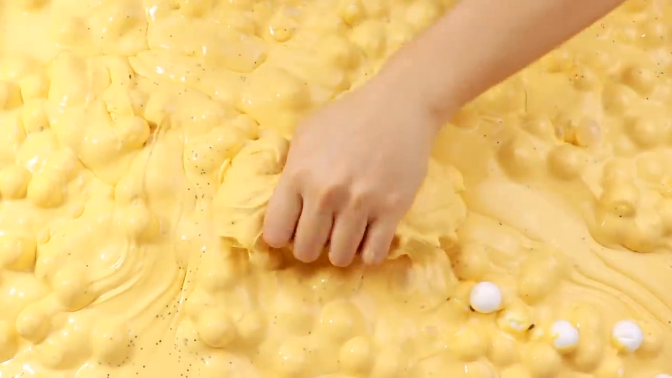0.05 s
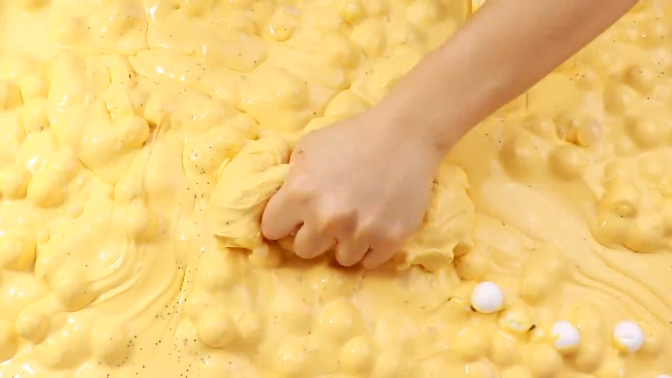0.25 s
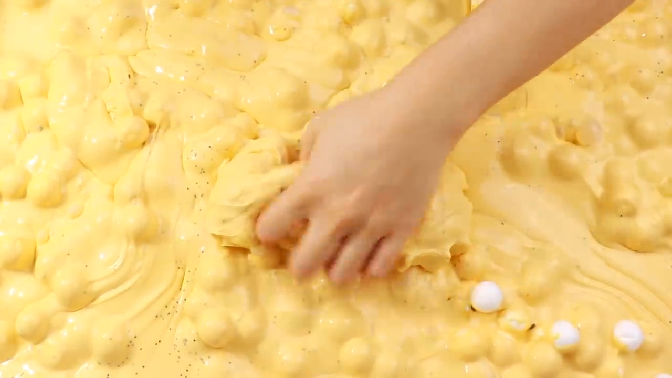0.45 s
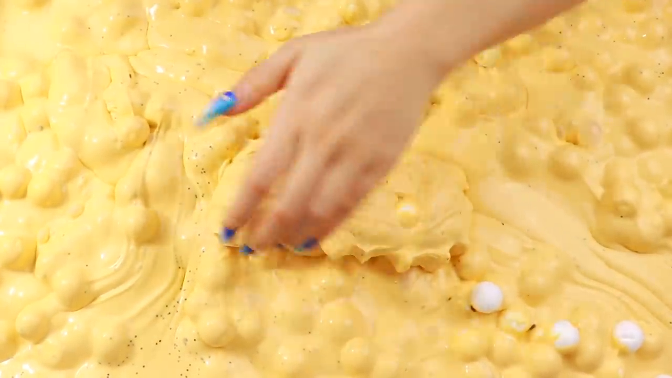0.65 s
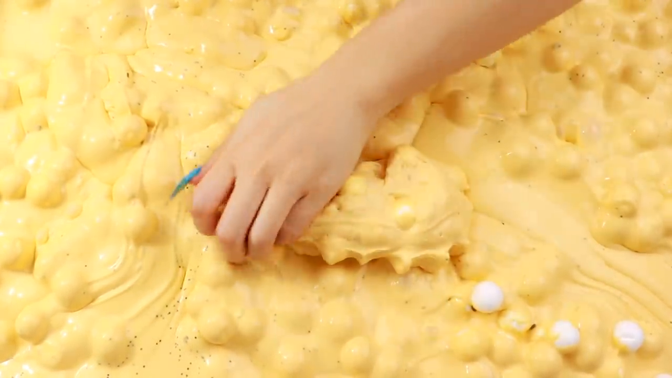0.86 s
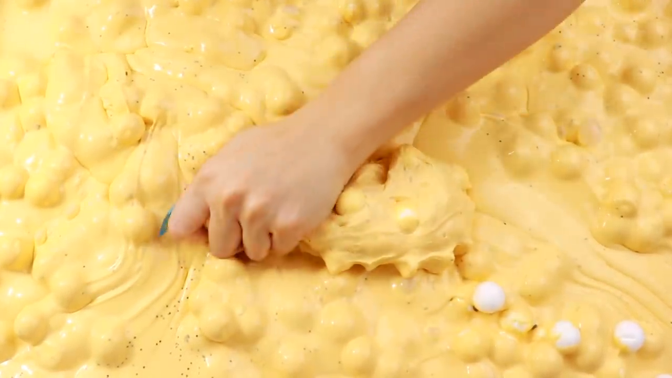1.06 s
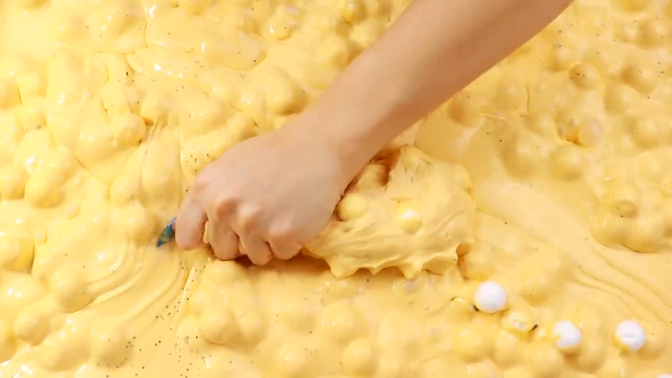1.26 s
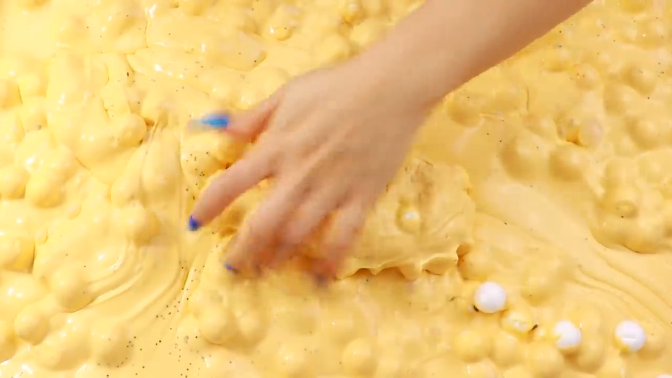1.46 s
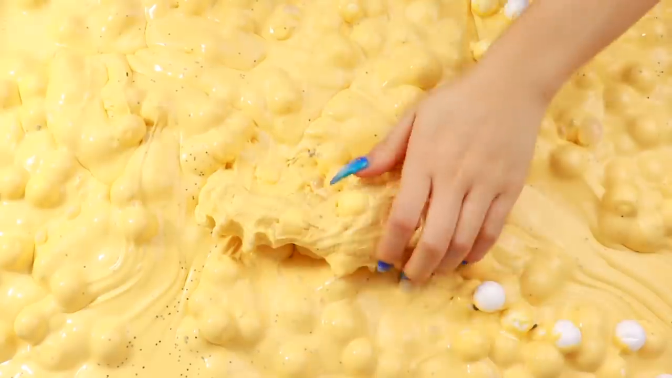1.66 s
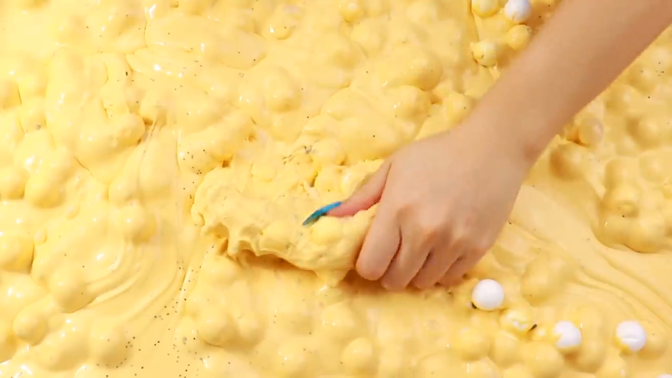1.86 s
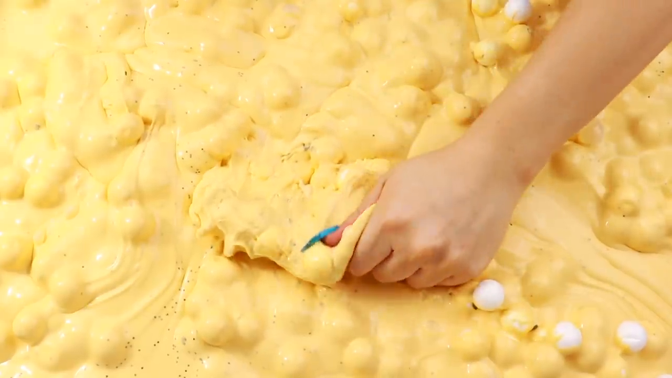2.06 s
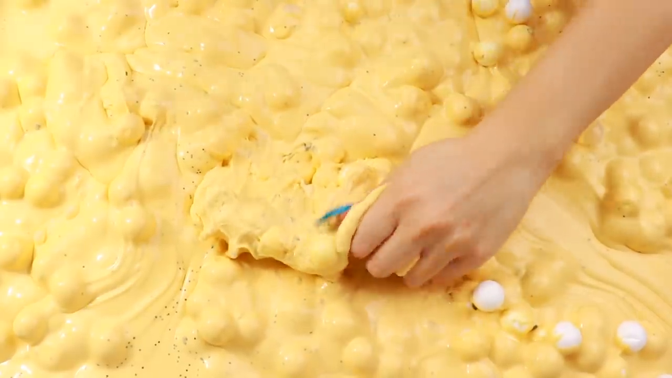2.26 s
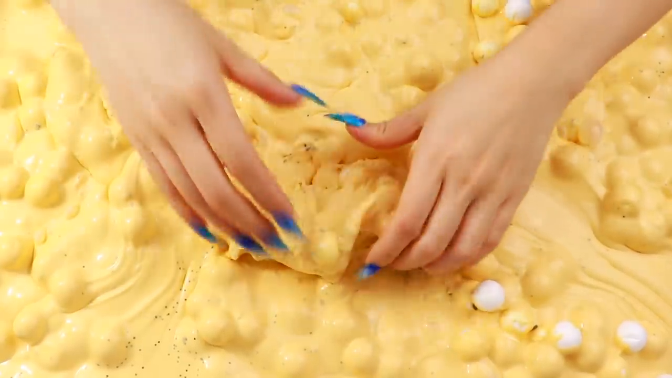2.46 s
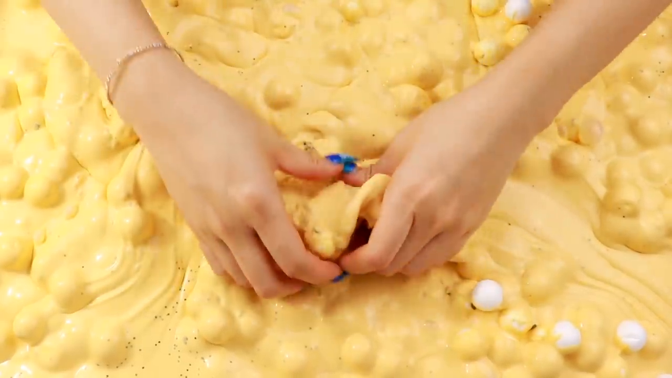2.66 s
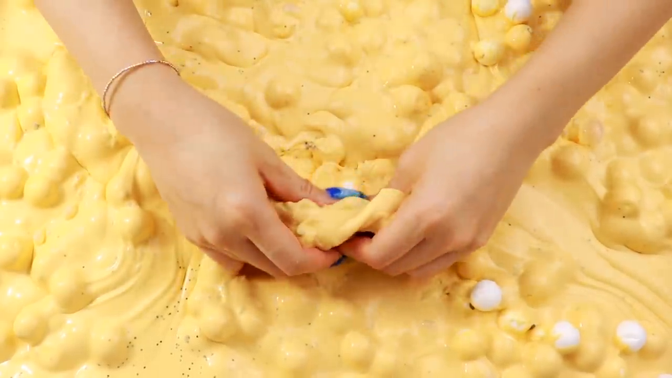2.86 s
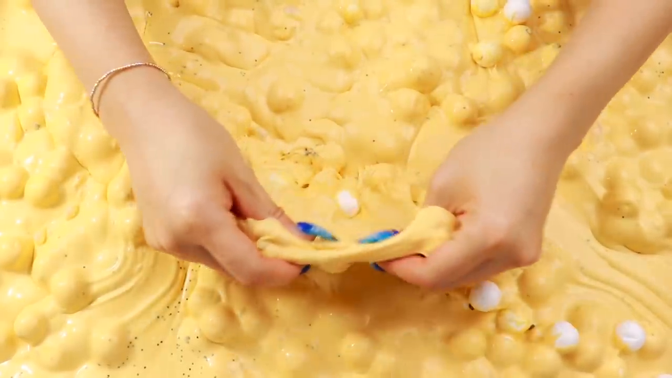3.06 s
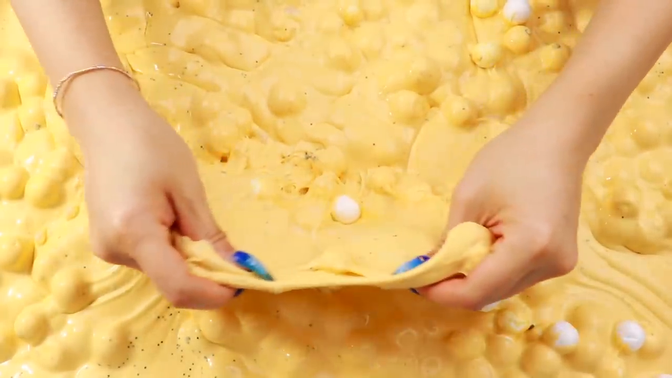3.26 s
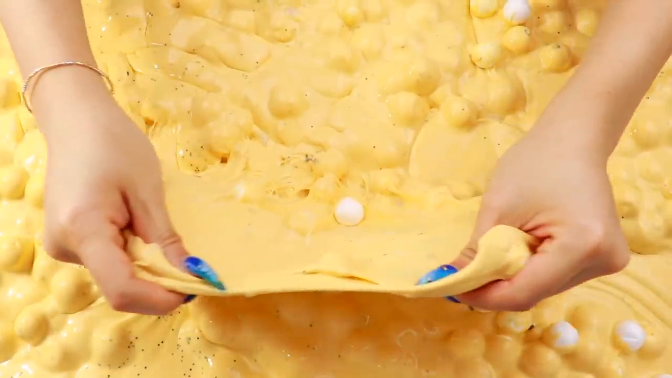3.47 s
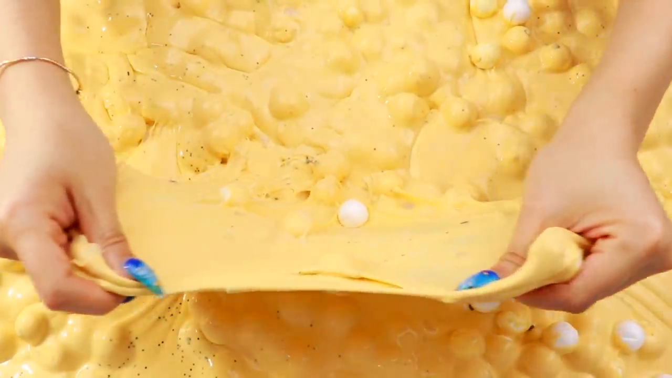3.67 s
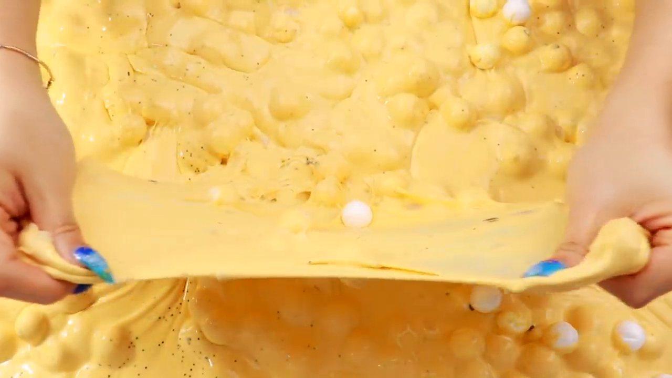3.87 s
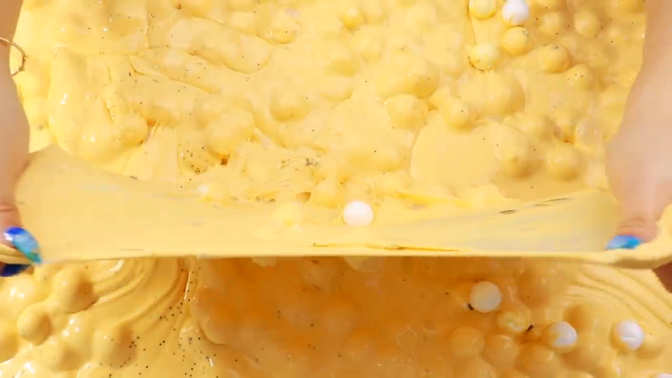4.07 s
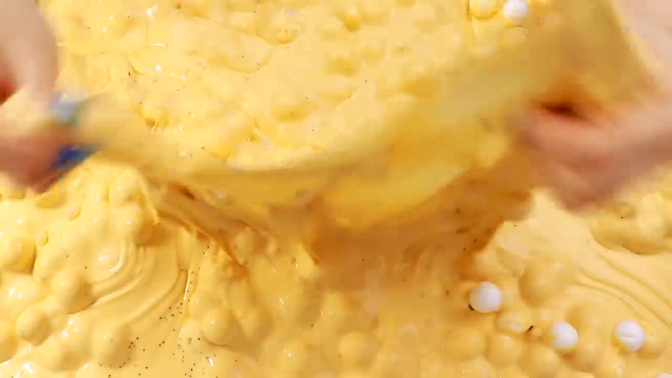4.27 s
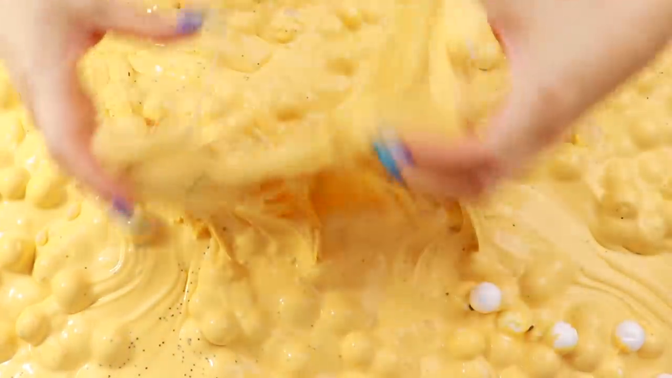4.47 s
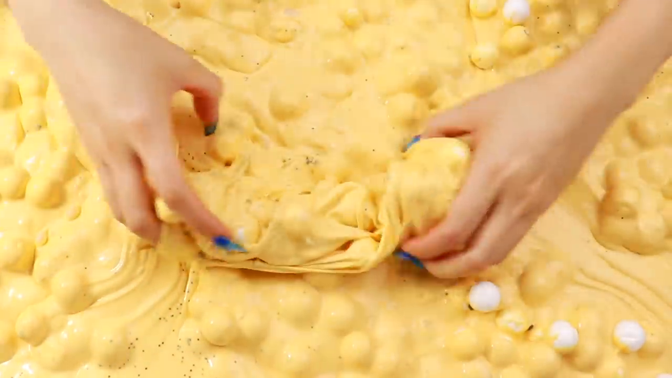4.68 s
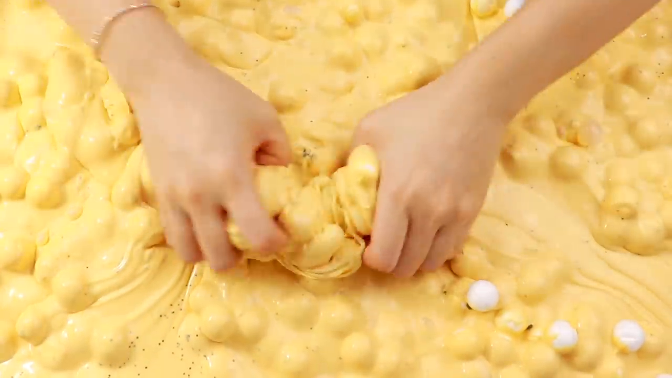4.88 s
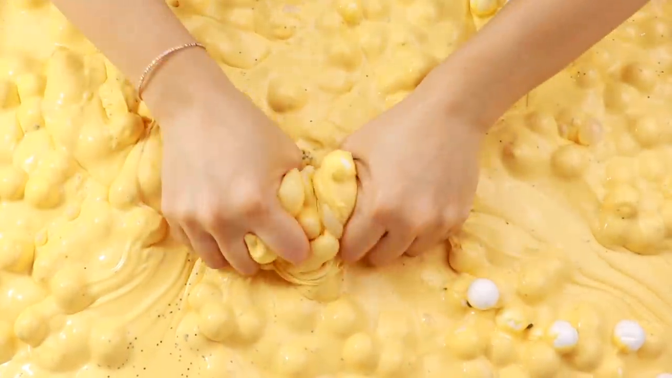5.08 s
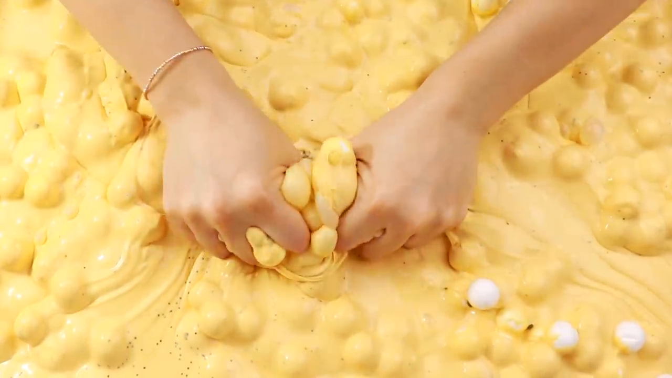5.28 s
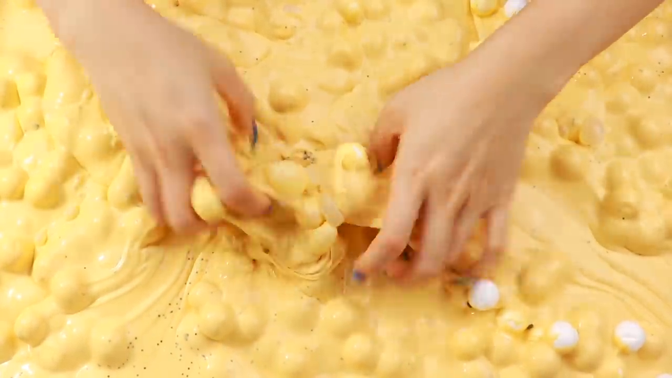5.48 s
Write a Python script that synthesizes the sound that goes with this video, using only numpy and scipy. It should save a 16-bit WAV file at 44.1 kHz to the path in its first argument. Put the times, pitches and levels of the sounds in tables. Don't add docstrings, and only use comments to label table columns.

```python
import sys
import numpy as np
from scipy import signal
from scipy.fft import rfft, irfft
from scipy.io import wavfile

SR = 44100
rng = np.random.default_rng(int(sys.argv[2]) if len(sys.argv) > 2 else 0)


def magnitude_from_level(level_db):
    exponent = np.asarray(level_db, float) / 20
    return 10 ** exponent


def wav_out(sig):
    wavfile.write(sys.argv[1], SR, np.round(np.clip(np.atleast_2d(sig).T, -1, 1) * 32767).astype(np.int16))


N = 243873

# (time [s], level [dB])
KNEAD = [(0, -47.5), (.35, -53.5), (.54, -66), (.72, -86), (.8, -56), (1.3, -62), (1.62, -74),
         (1.72, -55.5), (2.3, -56.5), (2.42, -72.5), (2.6, -58), (2.95, -54.5), (3.62, -69), (3.7, -70),
         (4.16, -74.5), (4.45, -65), (4.9, -55.5), (5.53, -57.5)]
# (time [s], half length [ms], fizz [dB], squelch above fizz [dB])
PEELS = [(0, 6.7, -23, -6), (.3, 26, -52, -9), (0.419, 15.6, -37.5, -7.5), (0.467, 25.6, -38.5, -0.5),
         (.95, 27, -51, -9), (1.101, 37, -47, -1.5), (1.382, 23, -39.5, -4.5), (1.411, 16, -40.5, -4),
         (1.452, 9.5, -34, -5.5), (2.279, 20.6, -47.5, 1.5), (2.326, 13.6, -39, 0.5),
         (2.372, 12.7, -45.5, 0), (3.155, 11, -53, -1), (4.266, 49, -49.5, -13), (4.94, 38, -40, -6),
         (5.206, 16, -47.5, 11.5), (5.399, 28, -39, -21), (5.46, 59, -38.5, -1)]
# (frequency [Hz], level [dB per Hz])
FIZZ_SPECTRUM = [(1060, -35), (1800, -0.5), (2200, -4), (4790, -11.5), (10600, -10), (13400, -5.5),
                 (16000, -16.5)]
# (frequency [Hz], level [dB per Hz])
SQUELCH_SPECTRUM = [(120, -31.5), (230, -2), (434, 5.5), (538, 3.5), (1860, 9), (2600, -7.5), (3380, -30),
                    (5720, -120)]
# (frequency [Hz], level [dB per Hz])
ROOM_TONE_SPECTRUM = [(59, -22), (100, 2.5), (200, -10), (398, -5), (1360, -23.5), (10900, -25),
                      (16000, -26)]
# (time [s], level [dB])
SHAKE = [(0, -53.5), (0.25, -43), (0.36, -54), (0.47, -45), (0.6, -55.5), (0.9, -44.5), (1.3, -61.5),
         (1.55, -48.5), (2.1, -55), (2.35, -55.5), (2.55, -42.5), (2.8, -53), (3.17, -50.5), (3.35, -61),
         (4, -62), (4.3, -53), (4.6, -55), (5.45, -57)]
# (time [s], peak [dB], centre [Hz])
SNAPS = [(0.0107, -22, 9200), (0.0142, -14.5, 6750), (0.0553, -13.5, 5400), (0.1176, -1.5, 8940),
         (0.1698, -12.5, 8560), (0.3855, -23, 3580), (0.7219, -12, 8230), (0.7258, -15, 9470),
         (0.8578, -15, 5120), (0.9736, -9.5, 4440), (1.0065, -28.5, 2200), (1.0382, -23, 7640),
         (1.0953, -31.5, 4700), (1.1075, -17.5, 9180), (1.2744, -20, 7360), (1.3863, -25, 3120),
         (1.6949, -23.5, 3310), (1.84, -12, 6580), (1.8843, -24, 4800), (1.9026, -15.5, 6640),
         (2.2798, -20, 7750), (2.5729, -23.5, 10400), (2.5818, -20, 8930), (2.6224, -15.5, 8600),
         (2.7238, -19.5, 3800), (2.7594, -14.5, 11510), (2.7807, -16, 7450), (5.0039, -10, 3460),
         (5.0834, -15.5, 9850)]
# (time [s], peak [dB], centre [Hz])
PINGS = [(0.0762, -22, 10800), (0.4148, -17.5, 2700), (0.9639, -26.5, 3300), (1.0273, -17, 9690),
         (1.0469, -21, 8770), (1.0558, -11, 9010), (1.1215, -18.5, 10930), (1.1418, -8, 14080),
         (1.2123, -17.5, 11340), (1.7351, -21.5, 4520), (2.606, -20.5, 12500), (2.6881, -17, 8360),
         (2.7678, -21, 3570), (2.8744, -17.5, 8530), (2.9614, -18, 12370), (4.2807, -24, 8690),
         (4.9324, -20, 5210), (4.9845, -23, 2790), (5.1331, -25, 6280), (5.2254, -18, 2570)]
# (time [s], peak [dB], centre [Hz])
TICKS = [(0.0724, -24, 3210), (0.218, -26, 12730), (0.7855, -32, 7660), (0.8215, -35, 3600),
         (0.842, -28.5, 5180), (0.9513, -24, 6450), (1.138, -21.5, 9000), (1.2472, -32.5, 3530),
         (1.4435, -26, 8570), (1.7469, -21, 3520), (1.7877, -27.5, 3400), (2.1275, -38, 3000),
         (2.2544, -26, 10200), (2.3664, -31, 4230), (2.5518, -34.5, 7560), (2.7395, -34, 6320),
         (2.8312, -26.5, 4140), (2.9407, -45, 3040), (2.951, -22.5, 2130),
         (3.009, -29, 5830), (3.1422, -22, 12100), (3.1533, -22.5, 7160), (3.173, -29.5, 8340),
                 (3.288, -50, 3110), (3.325, -34.5, 6160), (3.414, -35.5, 8100), (3.4843, -31, 3620),
                 (3.5061, -26, 7050), (3.573, -33, 4520), (3.591, -47, 5340), (3.617, -24.5, 9670),
                 (3.828, -44, 4240), (3.913, -44, 2656), (4.256, -38, 4980), (4.2634, -23.5, 9180),
                 (4.654, -42.5, 3310), (4.6807, -36.5, 3480), (4.712, -37, 3870), (4.7922, -25, 4080),
                 (4.816, -28, 3060), (4.839, -31, 10690), (4.853, -25.5, 8900), (5.0724, -20, 10600)]
# (time [s], peak [dB], centre [Hz], spread [octaves], burst [ms])
BIG_POCKETS = [(0.2351, 6.5, 7900, 0.65, 7), (0.2654, 9, 6490, 1.7, 5.1), (0.8624, 6, 7000, 1.6, 1.8),
               (1.06, 8, 9040, 1.6, 0.94), (1.1717, 9.5, 9360, 0.26, 2.2), (2.0027, -2, 7600, 0.57, 6.8),
               (2.7897, -11, 7636, 0.96, 7), (4.73, -15.5, 6160, 1.5, 3.2), (4.8762, -4.5, 4020, 0.59, 6.2),
               (4.924, -5, 6310, 1.3, 4), (4.9442, -17, 4470, 1.4, 3), (5.0929, -15.5, 7140, 3.2, 5.7),
               (5.1817, 1, 3534, 0.65, 5.8)]
# (time [s], peak [dB], centre [Hz], spread [octaves])
SMALL_POCKETS = [(0.0354, 0, 10900, 0.87), (0.0418, -18.5, 7320, 2.1), (0.0948, -9.5, 13540, 0.3),
                 (0.101, -2, 10400, 0.61), (0.1202, 4.5, 9600, 1.28), (0.1356, 9.5, 10100, 0.44),
                 (0.158, -9, 5800, 2), (0.1615, 6.5, 5230, 1.9), (0.167, -8, 8260, 2.26),
                 (0.1989, -1, 11300, 0.64), (0.2086, -13.5, 7100, 0.98), (0.3891, -17.5, 3140, 0.34),
                 (0.4085, -11, 7500, 1.26), (0.4246, -10.5, 4130, 2.3), (0.7053, -12, 5740, 0.72),
                 (0.8673, -7.5, 3600, 0.35), (0.875, 0, 4400, 1.54), (1.0582, -3, 8700, 0.95),
                 (1.8012, -11.5, 2910, 0.86), (1.942, 2, 8600, 1.42), (1.9621, -5.5, 10700, 0.88),
                (2.1399, -3.5, 4340, 1.63), (2.303, -21, 10570, 1.2), (2.6435, -17, 3940, 1.2),
                (3.0269, -11, 11300, 0.37), (4.5248, -9.5, 12930, 0.5), (4.7974, -13, 10200, 1),
                (5, -14.5, 5940, 1.5), (5.017, -16, 5960, 1), (5.0248, 1, 10680, 1.56),
                (5.035, -9, 3670, 1.1), (5.1238, 5.5, 8000, 2.1), (5.1393, -10, 2880, 0.4),
                (5.151, -2.5, 7420, 3.3), (5.254, -16.5, 3760, 0.51), (5.4868, -8, 7470, 2.4)]
# (time [s], peak [dB], centre [Hz])
THREADS = [(0.043, -21, 2500), (0.061, -26.5, 1800), (0.178, -30, 7890), (0.184, -34, 1500),
           (0.2257, -25, 5000), (0.378, -40, 2200), (0.429, -19, 2500), (0.434, -25, 1800),
           (0.814, -36, 1900), (0.837, -34, 4600), (0.916, -28, 2500), (0.939, -38, 1200),
           (1.222, -28.5, 3960), (1.234, -36.5, 1780), (1.624, -46.5, 2300), (1.649, -53, 7500),
           (1.777, -37, 2500), (1.843, -28, 1190), (1.906, -28, 2490), (1.958, -32, 2000),
           (1.978, -24, 2200), (2.02, -31.5, 1200), (2.041, -27.5, 2500), (2.106, -33.5, 3500),
           (2.118, -38, 2500), (2.214, -44, 1500), (2.381, -31.5, 2950), (2.545, -38, 2520),
           (2.62, -28.5, 3470), (2.631, -44, 3000), (2.708, -29, 4000), (2.899, -38, 5000),
           (2.931, -60, 1000), (3.039, -44.5, 3000), (3.2037, -33.5, 10400), (3.254, -38.5, 8500),
           (3.268, -54, 2850), (3.2937, -55.5, 6000), (3.372, -42.5, 6000), (3.386, -40, 1520),
           (3.432, -44, 1780), (3.6424, -39.5, 3260), (3.693, -53.5, 3330), (3.717, -48.5, 2590),
           (4.1892, -45, 6500), (4.212, -45, 9500), (4.3185, -49, 5000), (4.365, -39, 5430),
           (4.383, -43.5, 4250), (4.4576, -53, 2020), (4.575, -48.5, 4060), (4.7547, -37, 1190),
           (4.8668, -36, 1500), (4.872, -26, 3000), (4.89, -19, 4500), (5.006, -15, 1900)]
# (time [s], peak [dB], cavity [Hz])
PLOPS = [(0.118, -14.5, 1120), (0.1352, -10.5, 1830), (0.1984, -18, 910), (0.2072, -22, 1620),
         (0.2346, -7.5, 2045), (0.921, -27, 1275), (0.4245, -15.5, 1940), (0.4584, -20.5, 1867),
         (0.4817, -33, 980), (0.6914, -42, 876), (0.9029, -30.5, 1034), (0.9507, -26.5, 1250),
         (1.0055, -18, 1700), (1.027, -24, 1130), (1.06, -11, 1095), (1.1947, -26.5, 1690),
         (1.3999, -13.5, 1864), (1.6948, -20, 1786), (1.7358, -27, 1960), (1.7517, -21, 1660),
         (1.801, -25, 1170), (1.8217, -32.5, 430), (1.8589, -25, 1020), (1.8686, -23.5, 790),
         (1.8848, -29, 1400), (1.9418, -20, 1220), (2.0025, -20.5, 1045), (2.1398, -30, 937),
         (2.3039, -23, 1740), (2.3159, -38, 986),
         (2.689, -37, 1000), (2.7235, -31, 1700), (2.7624, -23.5, 1900), (2.9394, -20.5, 1760),
                   (2.9503, -21, 1037), (3.052, -46, 1204), (3.155, -28.5, 697), (3.406, -32.5, 1360),
                   (3.471, -40, 960), (3.485, -36.5, 1600), (3.5067, -34.5, 1570), (3.648, -41.5, 693),
                   (3.9121, -46, 522), (4, -53.5, 614), (4.1166, -54, 620), (4.516, -41, 905),
                   (4.7917, -20.5, 867), (4.9013, -12.5, 984), (4.9448, -24, 1330), (4.955, -15.5, 1630),
                   (4.9848, -18, 1140), (4.999, -18.5, 547), (5.0347, -20, 1310), (5.1389, -21, 1670),
                   (5.2186, -23.5, 558), (5.3972, -23, 1870), (5.4213, -18, 1940), (5.433, -21.5, 990)]
# (time [s], peak [dB], pitch [Hz], T60 [ms])
RINGS = [(0.1187, -13, 2160, 11), (0.134, -19, 1885, 30), (0.2346, -11, 1920, 34), (0.2352, -18, 1260, 18),
         (0.2355, -14, 506, 18), (0.265, -12, 1270, 12), (0.265, -15.5, 1960, 31), (0.267, -22, 302, 17),
         (0.862, -5, 3250, 11), (0.869, -14, 3300, 9.5), (1.249, -30, 3470, 12.5), (1.364, -29.5, 2080, 14),
         (1.44, -40.5, 315, 85), (1.552, -50.5, 314, 73), (2.138, -37.5, 313, 33), (2.315, -30, 354, 38),
         (2.438, -50.5, 313, 93), (2.617, -36, 973, 36), (2.685, -38, 315, 34), (2.759, -35, 397, 26),
         (2.869, -38, 266, 27), (3.2868, -40.5, 2900, 12), (3.506, -32, 2710, 13), (4.226, -30.5, 2720, 22),
         (4.2585, -26.5, 5040, 11), (4.456, -45.5, 2080, 20), (4.8767, 4, 3325, 11.4),
         (4.8767, 0, 2654, 14.3), (4.8763, -10.5, 1846, 35), (4.8771, -15, 1110, 14),
         (4.8765, -8.5, 610, 8.1), (4.9013, -10.5, 496, 13.5), (4.9233, -14, 3340, 12),
         (5.184, -4, 3530, 13), (5.181, -10.5, 1420, 13), (5.398, -26, 2620, 12), (5.472, -27, 2830, 12),
         (5.487, -23, 2840, 11)]
# (time [s], level [dB], length [ms])
THUMPS = [(0.138, -49, 15), (0.25, -37.5, 40), (0.481, -43, 46), (0.862, -44.5, 17), (0.911, -47, 33),
          (1.063, -31, 15), (1.25, -54, 27), (1.397, -42, 16), (1.464, -50.5, 35), (1.871, -46.5, 53),
          (2.338, -49.5, 97), (2.366, -63.5, 25), (2.953, -41, 27), (3.169, -51, 39), (4.12, -61.5, 37),
          (4.3, -59, 92), (4.52, -57, 93), (4.879, -47.5, 95), (5.181, -44, 8.1), (5.468, -42, 120)]
# (time [s], peak [dB])
FLECKS = [(0.1875, -26), (0.2927, -14), (0.3044, -21), (0.5174, -40.5), (1.0116, -27), (1.7564, -36),
          (1.7759, -27.5), (1.8616, -33), (1.9916, -21), (4.9145, -15), (4.9654, -27), (5.1955, -21.5),
          (5.2113, -24)]
# (time [s], pitch [Hz], level [dB])
SQUEAK = [
    (1.803, 3530, -79.5),
    (1.81, 4300, -40),
    (1.824, 4700, -58),
    (1.83, 4700, -75),
    (1.84, 4900, -84.5),
]
# (time [s], half length [ms], level [dB], centre [Hz])
SEEPS = [(3.21, 12, -60, 9100), (3.336, 13, -69, 5600), (3.39, 9.2, -64, 2000), (3.435, 14, -62.5, 2500),
         (3.514, 11, -48.5, 10000), (3.574, 9.7, -59, 5170), (3.597, 10, -57, 4960),
         (3.635, 15, -63.5, 2490), (3.839, 19, -70, 4120), (3.85, 23, -66.5, 9270),
         (3.917, 6.7, -58.5, 2550), (4.215, 18, -59.5, 2620), (4.255, 18, -49, 3040),
         (4.315, 6.1, -47, 8270), (4.387, 8.4, -59, 5000), (4.501, 8, -57.5, 1520), (4.541, 7.6, -54, 1314),
         (5.06, 19, -50.5, 1490), (5.311, 31, -60, 3100)]

SQUELCH_FOLLOWS, SQUELCH_DB = 1.147, 6
ROOM_T60_S, ROOM_DB, ROOM_TONE_DB = 0.11, -16.5, -69
SMALL_BURST_MS, SMALL_VENT_DB, BIG_VENT_DB = 0.6, -30.5, -29
VENT_LAG = 0.72
RING_MS, RING_CYCLES = 2.2, 2.6
CREAK_S, CREAK_MS, CREAK_HZ, CREAK_DB = 3.129, 9.0, 610, -45
SEEP_OCTAVES = 0.28
TREBLE_HZ, TREBLE_LOSS, CLIP_LEVEL = 10200, 0.26, .88


def rms_one(x):
    return x / np.sqrt(np.mean(x ** 2) + 1e-20)


def in_time(rows):
    s, *columns = np.transpose(rows)
    return [np.interp(np.arange(N) / SR, s, c) for c in columns]


def band(x, low_hz, high_hz, order=2):
    high_hz = min(high_hz, .45 * SR)
    low_hz = min(low_hz, .9 * high_hz)
    return signal.sosfilt(signal.butter(order, [low_hz, high_hz], "band", fs=SR, output="sos"), x)


def coloured(x, spectrum):
    hz, db = np.transpose(spectrum)
    grid_hz = np.maximum(np.fft.rfftfreq(N, 1 / SR), 1)
    gain_db = np.interp(np.log(grid_hz), np.log(hz), db)
    return rms_one(irfft(rfft(x) * magnitude_from_level(gain_db), N))


def drift(rate_hz):
    r = np.exp(-2 * np.pi * rate_hz / SR)
    settle = 4000
    return rms_one(signal.lfilter([1], [1, -2 * r, r * r], rng.standard_normal(N + settle))[settle:])


def add(track, s, sound):
    start = round(s * SR)
    track[start:start + len(sound)] += sound[:N - start]


def tear(noise, hz, octaves, burst_ms, edge_db, punch=2.2):
    t = np.arange(len(noise)) / SR
    step = np.sign(noise[0]) * (t == 0)
    rip = punch * step + noise * np.exp(-t * 1400 / burst_ms)
    spread = 2 ** (0.79 * max(octaves, .15))
    body = band(rip, hz / spread, hz * spread)
    edge = band(step + .6 * noise[::-1] * np.exp(-t * 3500), 550, 14000)
    sound = body / np.abs(body).max() + magnitude_from_level(edge_db) * edge / np.abs(edge).max()
    return sound / np.abs(sound).max()


def stickiness():
    t = np.arange(N) / SR
    work_db, = in_time(KNEAD)
    fizz = magnitude_from_level(work_db)
    squelch = magnitude_from_level(SQUELCH_FOLLOWS * work_db + SQUELCH_DB)
    for s, half_ms, db, wet_db in PEELS:
        swell = magnitude_from_level(db - 6 * ((t - s) * 1000 / half_ms) ** 2)
        fizz = fizz + swell
        squelch = squelch + magnitude_from_level(wet_db) * swell
    return fizz, squelch


def sticky(spectrum, low_hz, high_hz, per_s, cycles, smooth, clump_db):
    pitches = 14
    clumps = magnitude_from_level(clump_db * drift(35))
    sizes = magnitude_from_level(3.5 * np.minimum(rng.exponential(1, N), 4)) * rng.choice([-1, 1], N)
    clicks = sizes * (rng.random(N) < per_s * clumps / SR) + 1e-18
    dealt = rng.integers(0, pitches, N)
    grains = np.zeros(N)
    for k, hz in enumerate(np.geomspace(low_hz, high_hz, pitches)):
        r = magnitude_from_level(-60 * hz / (cycles * SR))
        poles = [1, -2 * r * np.cos(2 * np.pi * hz / SR), r * r]
        grains += np.sqrt(hz) * rms_one(signal.lfilter([1, 0, -1], poles, clicks * (dealt == k)))
    hiss = rng.standard_normal(N) * np.sqrt(clumps)
    return coloured(rms_one(grains) + smooth * rms_one(hiss), spectrum)


def room_tone():
    return magnitude_from_level(ROOM_TONE_DB) * coloured(rng.standard_normal(N), ROOM_TONE_SPECTRUM)


def room(x):
    t = np.arange(round(.4 * SR)) / SR
    echo = band(rng.standard_normal(len(t)), 500, 9000) * magnitude_from_level(-60 * t / ROOM_T60_S) * (t > .004)
    return magnitude_from_level(ROOM_DB) * signal.fftconvolve(x, echo / np.sqrt(np.sum(echo ** 2)))[:N]


def rumble():
    white = rng.standard_normal(N)
    table = band(white, 8.4, 25)
    tray = 0.31 * band(white[::-1], 38, 80)
    return rms_one((table + tray) * magnitude_from_level(2.2 * drift(2.7)))


def hum(hz=130, db=-74):
    return magnitude_from_level(db) * rms_one(band(rng.standard_normal(N), hz - 8, hz + 8))


def whine(hz=4030, db=-81):
    return magnitude_from_level(db) * rms_one(band(rng.standard_normal(N), hz - 25, hz + 25))


def snaps(burst_ms=1.3, edge_db=-10, snap_octaves=2.1, ping_octaves=0.31, tick_octaves=0.72):
    out = np.zeros(N)
    kinds = [(SNAPS, snap_octaves), (PINGS, ping_octaves), (TICKS, tick_octaves)]
    for table, octaves in kinds:
        for s, db, hz in table:
            add(out, s, magnitude_from_level(db) * tear(rng.standard_normal(600), hz, octaves, burst_ms, edge_db))
    return out


def vent(noise, flutter, hz, octaves, burst_ms, hiss_db):
    t = np.arange(len(noise)) / SR
    spread = 2 ** (0.19 + 1.4 * octaves)
    t60_s = 0.016 + 0.032 * burst_ms
    hiss = rms_one(band(noise, hz / spread, hz * spread)) * magnitude_from_level(hiss_db - 2.0 - 60 * t / t60_s)
    whistle = rms_one(band(noise[::-1], hz / 1.1, hz * 1.3)) * magnitude_from_level(hiss_db - 11 - 30 * t / t60_s)
    sputter = magnitude_from_level(1.3 * np.repeat(flutter, 60))
    return (hiss + whistle) * sputter * np.minimum(t / 0.00052, 1)


def bursts(edge_db=-6):
    out = np.zeros(N)
    pockets = [(*row, BIG_VENT_DB) for row in BIG_POCKETS]
    for row in SMALL_POCKETS:
        pockets.append((*row, SMALL_BURST_MS, SMALL_VENT_DB - VENT_LAG * row[1]))
    for s, db, hz, octaves, burst_ms, hiss_db in pockets:
        rip_noise, vent_noise = rng.standard_normal((2, 6000))
        pocket_edge_db = edge_db + 6 * np.log2(min(octaves, 1))
        rip = tear(rip_noise, hz, octaves, max(burst_ms - .6, .5), pocket_edge_db)
        hiss = vent(vent_noise, rip_noise[-100:], hz, octaves, burst_ms, hiss_db)
        add(out, s, magnitude_from_level(db) * (rip + hiss))
    return out


def threads(burst_ms=2.0, octaves=0.96, edge_db=-10):
    out = np.zeros(N)
    for (s, db, hz), noise in zip(THREADS, rng.standard_normal((60, 600))):
        add(out, s, magnitude_from_level(db) * tear(noise, hz, octaves, burst_ms, edge_db))
    return out


def plops(rough=.5, rise=.2):
    out, t = np.zeros(N), np.arange(1500) / SR
    for s, db, hz in PLOPS:
        noise = rng.standard_normal(len(t))
        life_s = RING_MS / 1000 / 2 + RING_CYCLES / hz
        glide = 0.797 + rise * np.minimum(t / life_s, 2)
        ring = np.sin(2 * np.pi * hz * t * glide) * np.sign(noise[0])
        walls = rms_one(band(noise, hz / 3.3, hz * 2.68, order=3))
        sound = (ring + rough * walls) * np.exp(-1.5 * t / life_s) * np.minimum(t * hz * 4, 1)
        add(out, s, magnitude_from_level(db) * sound / np.abs(sound).max())
    return out


def rings():
    out, t = np.zeros(N), np.arange(4000) / SR
    for (s, db, hz, t60_ms), sign in zip(RINGS, rng.choice([-1, 1], 60)):
        t60_s = min(t60_ms / 1000, 32 / hz)
        tone = np.sin(2 * np.pi * hz * t) * np.minimum(t * hz, 1)
        add(out, s, sign * magnitude_from_level(db - 60 * t / t60_s) * tone)
    return out


def push():
    t = np.arange(N) / SR
    swell = sum(magnitude_from_level(db) * np.exp(-((t - s) * 1600 / ms) ** 2) for s, db, ms in THUMPS)
    return swell * rms_one(band(rng.standard_normal(N), 35, 340))


def flecks(hz=11500, octaves=0.76, burst_ms=0.88, edge_db=-14, gain_db=3):
    out = np.zeros(N)
    for (s, db), noise in zip(FLECKS, rng.standard_normal((20, 600))):
        add(out, s, magnitude_from_level(db + gain_db) * tear(noise, hz, octaves, burst_ms, edge_db))
    return out


def squeak():
    hz, db = in_time(SQUEAK)
    phase = 2 * np.pi * np.cumsum(hz) / SR
    open_slit = (hz > SQUEAK[0][1]) & (hz < SQUEAK[-1][1])
    return open_slit * magnitude_from_level(db) * (np.sin(phase) + 1.5 * np.sin(2 * phase))


def creak():
    t = np.arange(N) / SR - CREAK_S
    slips = signal.sawtooth(2 * np.pi * CREAK_HZ * t)
    return magnitude_from_level(CREAK_DB - 6 * (t * 1000 / CREAK_MS) ** 2) * band(slips, 800, 3000, order=1)


def seeps():
    out, t = np.zeros(N), np.arange(-4000, 4000) / SR
    spread = 2 ** SEEP_OCTAVES
    for s, half_ms, db, hz in SEEPS:
        hiss = rms_one(band(rng.standard_normal(len(t)), hz / spread, hz * spread))
        add(out, s + t[0], magnitude_from_level(db - 6 * (t * 1000 / half_ms) ** 2) * hiss)
    return out


def scene():
    fizz, squelch = stickiness()
    shake_db, = in_time(SHAKE)
    slime = bursts() + snaps() + plops() + squeak() + creak()
    slime += fizz * sticky(FIZZ_SPECTRUM, 2237, 10500, per_s=2100, cycles=19, smooth=1.0, clump_db=5.0)
    slime += squelch * sticky(SQUELCH_SPECTRUM, 170, 1300, per_s=1200, cycles=10.0, smooth=1.0, clump_db=3.5)
    crackle = sticky(FIZZ_SPECTRUM, 900, 9000, per_s=90, cycles=7.0, smooth=.02, clump_db=4.0)
    slime += fizz * magnitude_from_level(-11) * crackle
    slime += rings() + seeps() + threads() + flecks()
    air = room_tone()
    echo = room(slime)
    table = magnitude_from_level(shake_db) * rumble() + push()
    return (slime + echo + table + hum() + whine() + air)[None]


def top_cut(x):
    return signal.sosfilt(signal.butter(12, 16650, fs=SR, output="sos"), x)


def record(dry):
    treble = signal.sosfiltfilt(signal.butter(2, TREBLE_HZ, "high", fs=SR, output="sos"), dry)
    clipped = np.clip(dry - TREBLE_LOSS * treble, -CLIP_LEVEL, CLIP_LEVEL)
    return top_cut(clipped)


dry = scene()
out = record(dry)
wav_out(out)
```